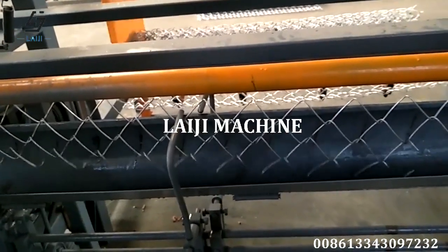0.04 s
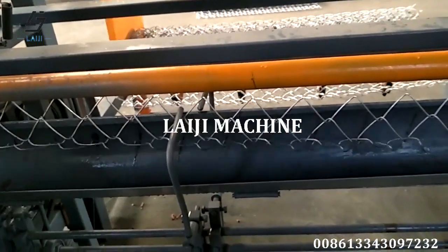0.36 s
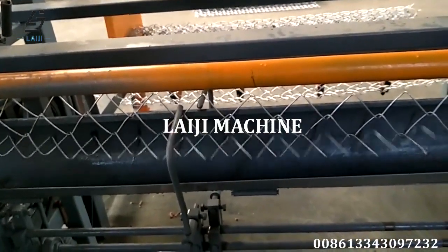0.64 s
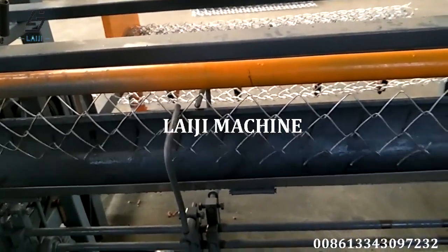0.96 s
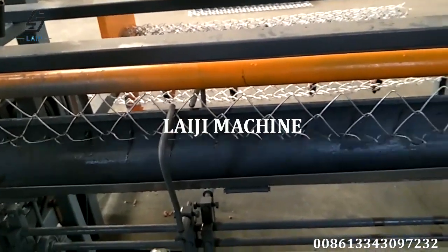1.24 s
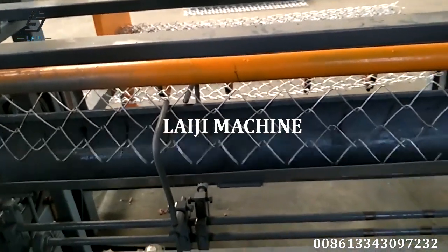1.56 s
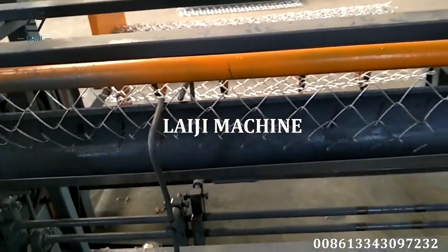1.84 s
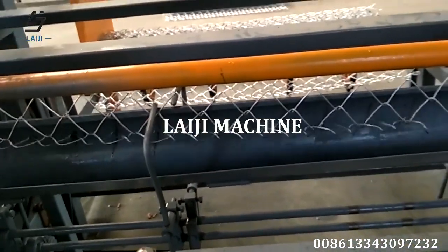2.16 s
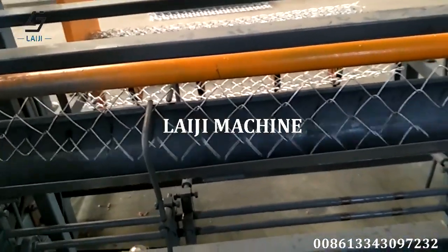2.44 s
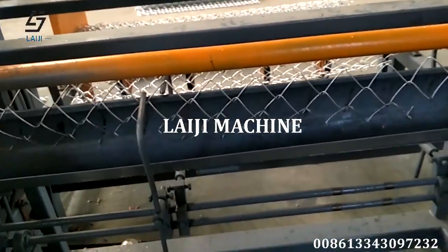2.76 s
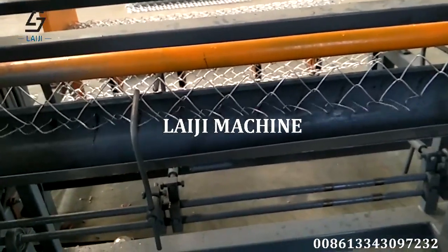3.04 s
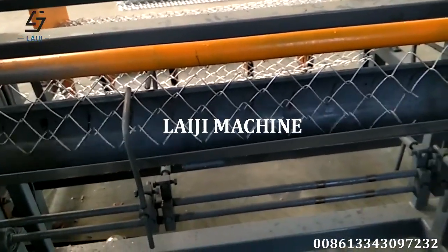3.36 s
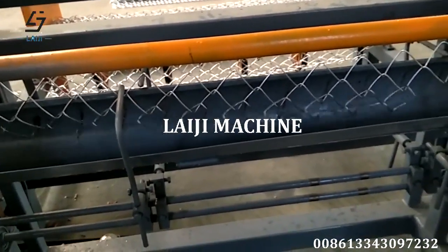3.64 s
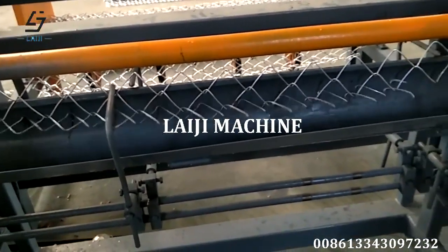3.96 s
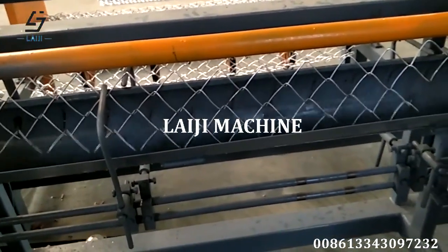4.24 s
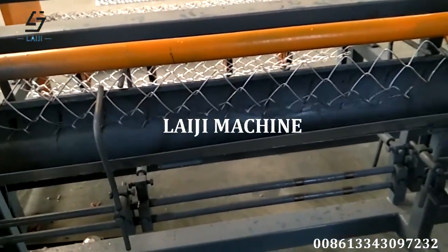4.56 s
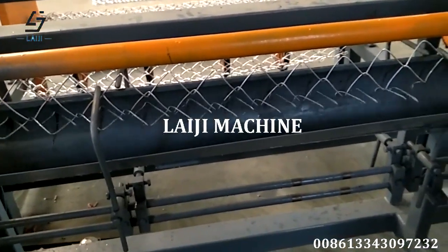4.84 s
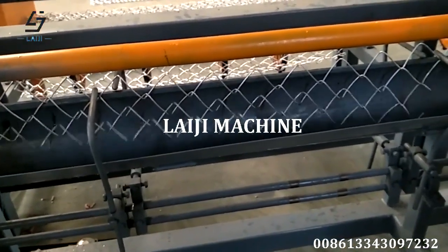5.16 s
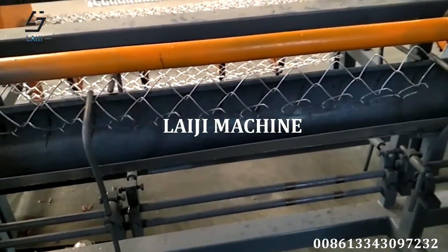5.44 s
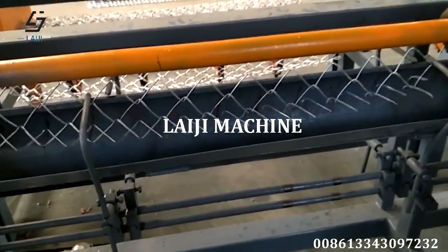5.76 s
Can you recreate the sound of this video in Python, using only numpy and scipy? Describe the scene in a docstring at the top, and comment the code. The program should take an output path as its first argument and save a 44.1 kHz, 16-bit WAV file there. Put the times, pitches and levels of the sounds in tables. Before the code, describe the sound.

A chain-link weaving machine runs in a hard-walled workshop, heard from close above its roller. A low motor hum and quiet rumble continue throughout. It opens with a faint fading metal ring and a few light wire scrapes. The cutter then slams shut at about 0.9, 1.6, 2.6, 3.4, 4.3 and 5.1 seconds. These blows are by far the loudest sounds: sharp, bright steel clanks with a brief high ring, loose jangling and a short echo. Between them, the wire spiral and hanging mesh tick, scrape and rattle more softly, getting busier from about 3.5 seconds, with clearer clinks near 4.1 and 5.2 seconds. The frame gives occasional dull knocks, most noticeably around 4.5 seconds. A dry bearing squeals faintly near 2.7 seconds and more weakly near 4.7. Light wire clatter carries on until the end, near 6 seconds.

```python
"""A chain-link weaving machine

The machine works in a hard-walled shop and is heard from just above its roller. About every 0.85 s
the cutter slams shut and its steel parts ring. Between the blows the wire spiral and the hanging mesh
clatter and tick, each sound made of many tiny impacts. The frame knocks, a dry bearing squeals
faintly and the motor hums underneath."""
import sys
import numpy as np
from scipy import signal
from scipy.fft import rfft, irfft, next_fast_len
from scipy.io import wavfile
from scipy.ndimage import uniform_filter1d

SR = 44100
rng = np.random.default_rng(int(sys.argv[2]) if len(sys.argv) > 2 else 0)


def generate_wav(signal):
    """Clip the signal to [-1, 1] and save it as 16-bit WAV at the path in sys.argv[1]."""
    frames = np.transpose(np.atleast_2d(signal))
    scaled = np.clip(frames, -1, 1) * 32767
    pcm = np.round(scaled).astype(np.int16)
    wavfile.write(sys.argv[1], SR, pcm)


N = 259749
TIME = np.arange(N) / SR

# Levels in dB are relative: 0 leaves a sound as it is, -6 about halves its height.
# The tone of the shop's rumble. Each row: frequency in Hz, level in dB.
SHOP_TONE = [(15, 5), (25, 4), (105, -7), (145, -7), (277, -13.5), (451, -12.5), (575, -16.5),
             (1290, -16.5), (1650, -19), (2160, -17.5), (2350, -20), (7110, -29.5), (10700, -36),
             (16000, -77)]
# The shop's echo. Each row: frequency in Hz, seconds to fade by 60 dB, level in dB.
ECHO_BANDS = [(300, 0.65, -19), (1030, 0.65, -4), (2770, 0.53, -9), (4770, 0.61, -12.5),
              (9200, 0.75, -12.5), (14000, 0.63, -9.5)]
# How the motor's low hum swells. Each row: time in seconds, level in dB.
HUM_SWELLS = [(0.0, -70), (0.4, -56.5), (1.4, -74), (1.6, -64), (2.1, -73.9), (2.3, -63), (2.9, -56.5),
              (3.49, -79), (4.09, -54.7), (4.79, -57.5), (5.49, -53), (5.89, -58.5)]
# The motor's steady higher tones. Each row: frequency in Hz, level in dB.
MOTOR_TONES = [(100, -67.5), (275, -69), (363, -78)]
# Squeals of the dry bearing. Each row: start in seconds, hold in seconds, level in dB.
BEARING_SQUEALS = [(2.5, .1, -59), (2.708, 0.25, -51), (4.665, 0.38, -62.5)]
# Dull knocks of the frame. Each row: time in seconds, pitch in Hz, level in dB.
FRAME_KNOCKS = [(.14, 730, -48.5), (.5, 559, -56.5), (1.81, 754, -45), (2.08, 840, -49), (2.23, 840, -51),
                (2.77, 300, -52.5), (2.91, 720, -44), (2.93, 283, -50), (3.5, 487, -55.5), (3.8, 196, -52),
                (4.41, 710, -50), (4.53, 504, -40.5), (4.565, 200, -41.5), (5.46, 890, -46.5),
                (5.46, 202, -53)]
# The tones of the frame, the wire and its rubbing surface. Each row: frequency in Hz, level in dB.
FRAME_TONE = [(100, -16), (300, -19), (800, 1), (1300, -3.5), (2100, 8), (2800, -14), (4500, -9.5)]
WIRE_TONE = [(1500, -88), (2600, -6), (3300, -6.5), (4200, -1.5), (5300, 4.5), (6400, -4), (7500, -20.5),
             (11000, -34)]
FIZZ_TONE = [(4500, -24), (7500, -4.5), (9500, -3.5), (11500, 2.5), (13500, 4), (16000, -4)]
# Wire slips over wire. Each row: time in seconds, level in dB.
WIRE_SCRAPES = [(0.074, -32.5), (0.301, -39), (0.41, -41), (0.8, -48.5), (1.262, -45), (1.349, -50.5),
                (1.496, -47.5), (1.874, -37), (1.999, -41.5), (2.83, -30.5), (3.535, -35), (3.613, -37),
                (3.977, -40), (4.061, -31.5), (4.731, -46), (5.499, -39), (5.743, -37)]
# A loose wire end hits a bar. Each row: time in seconds, level in dB.
WIRE_CLINKS = [(2.54, -54), (3.63, -54), (3.696, -39), (3.743, -45), (4.06, -25.5), (4.988, -34),
               (5.246, -23.5), (5.509, -32.5), (5.804, -38)]
# The spiral drops onto the mesh; the rows at 0.882 s and 4.336 s are instead wire scrapes that lead into the
# cutter's blows. Each row: time in seconds, level in dB, decay in seconds, # brightness in dB.
SPIRAL_RATTLES = [(0.134, -41, 0.026, -23), (0.882, -43.5, 0.18, 3), (0.999, -36.5, 0.03, 0),
                  (1.796, -36.5, 0.06, 5.5), (2.066, -33.5, 0.048, -2), (2.215, -40, 0.076, 5),
                  (2.899, -33, 0.056, -4), (3.794, -25.5, 0.03, 1.5), (4.336, -36.5, 0.076, 1.5),
                  (4.492, -36.5, 0.055, 0.5), (4.677, -34.5, 0.019, 5), (4.731, -36.5, 0.036, 7.5),
                  (4.797, -29, 0.034, -2), (5.459, -53, 0.018, -33), (5.589, -43.5, 0.079, 1)]
# The cutter's blows. Each row: time in seconds, level in dB, rise in seconds, decay in seconds,
# pitch as a ratio, level of the mesh ticking that follows in dB, then how loudly the bar,
# the blade and the wire end ring, each in dB.
CUTTER_BLOWS = [(0.091, -44, .002, .01, 1.4, -65, -14, -11, -24),
                (0.906, -10.5, 0.0051, .015, 1.06, -77, -6.5, 5.5, 2),
                (1.6195, -14, .0008, 0.02, 1.085, -52, -0.5, -22, -2.5),
                (2.6244, -10.5, 0.0015, .017, 0.99, -77, -5.5, 3, -3),
                (3.3652, -10.5, 0.0021, .013, 1.13, -50, -6.5, -18.5, 3),
                (4.3496, -10, 0.0037, 0.017, 0.97, -50, 2, 3, -6),
                (5.1177, -9, 0.0009, .012, 1.16, -57.5, -1, -8.5, -4)]
# The notes the cutter rings at. Each row: frequency in Hz, level in dB, seconds to fade by 60 dB,
# part (0 is the bar, 1 the blade, 2 the wire end).
CUTTER_NOTES = [(1168, -35, .36, 0), (1235, -37, .1, 0), (1750, -43, .18, 0), (2880, -37, .1, 1),
                (3177, -17, .09, 1), (3290, -27, .06, 1), (4167, -37, .15, 1), (5135, -29, .1, 1),
                (5378, -35, .12, 1), (6186, -16, .12, 2), (6290, -27, .06, 2), (6530, -32, .1, 2),
                (7031, -35, .2, 2)]
# The tone of steel chattering on steel. Each row: frequency in Hz, level in dB.
CHATTER_TONE = [(150, -47), (450, -28), (950, -24.5), (1300, -17.5), (2400, -15.5), (3400, -5),
                (4200, -4.5), (5200, -1.5), (6400, -3), (7500, -11), (10000, -13), (15500, -20)]
# How the machine sounds on each side. Each row: frequency in Hz, left minus right in dB.
SIDE_BALANCE = [(120, -2.5), (400, -3), (700, -4), (1300, -8.5), (2400, -10), (3300, -5.5), (4900, 0.5),
                (6300, -0.5), (8000, -4), (15000, -1.5)]

MESH_REST_DB = -64  # ticking between feeds
LEFT_RIGHT = np.array([[1], [-1]])  # plus on the left, minus on the right


def undb(db):
    """Turn decibels into a number to multiply by."""
    return 10 ** (np.asarray(db) / 20)


def unit(x):
    """Scale a signal to an average power of 1."""
    return x / np.sqrt(np.mean(x ** 2))


def colour(x, points):
    """Shape a sound's tone by (Hz, dB) points; white noise keeps its power."""
    hz, db = np.transpose(points)
    size = next_fast_len(x.shape[-1])
    log_hz = np.log(np.arange(size // 2 + 1) * SR / size + 1)
    gain = undb(np.interp(log_hz, np.log(hz), db))
    return irfft(rfft(x, size) * unit(gain), size)[..., :x.shape[-1]]


def add(out, s, sound):
    """Mix in a stereo sound starting at s seconds."""
    start = int(s * SR)
    lo, hi = max(start, 0), min(start + sound.shape[-1], N)
    out[:, lo:hi] += sound[:, lo - start:hi - start]


def fade(t, t60):
    """Die away by 60 dB every t60 seconds."""
    return np.exp(-np.log(1000) * t / t60)


def swell(t, rise_s, decay_s):
    """Grow to a peak at t = 0, then die away."""
    return np.exp(np.minimum(t, 0) / rise_s - np.maximum(t, 0) / decay_s)


def gate(s, attack_s, hold_s, release_s):
    """Starting at s seconds: ramp up, hold, then die away."""
    t = TIME - s
    return np.clip(t / attack_s, 0, 1) * np.exp(-np.maximum(t - attack_s - hold_s, 0) / release_s)


def wander(per_s, size=N):
    """Glide between random values, typically about 1 either side of zero."""
    hold = int(SR / per_s)
    steps = np.repeat(rng.standard_normal(size // hold + 1), hold)
    return unit(uniform_filter1d(uniform_filter1d(steps, hold), hold)[:size])


def contacts(size, per_s, spread_db):
    """Tiny impacts at random times and of uneven strength."""
    hit = rng.random(size) < per_s / SR
    direction = rng.choice([-1, 1], size)
    strength = undb(spread_db * np.clip(rng.standard_normal(size), -2, 2))
    return unit(hit * direction * strength)


def steel(ring_db, t60, scatter_db, scatter_s, notes_per_hz, uneven_db, lag_s=.0005):
    """How one spot answers a tap: a click, ringing wire notes and reflections from the bars."""
    t = np.arange(SR // 8) / SR
    bins = len(t) // 2 + 1
    is_note = rng.random(bins) < notes_per_hz * SR / len(t)
    strength = is_note * undb(uneven_db * rng.standard_normal(bins))
    notes = irfft(strength * np.exp(2j * np.pi * rng.random((2, bins))), len(t)) * fade(t, t60)
    bars = rng.standard_normal((2, len(t))) * np.exp(-t / scatter_s)
    response = (undb(ring_db) * unit(notes) + undb(scatter_db) * unit(bars)) / np.sqrt(len(t))
    # each spot lies at its own angle, so the click reaches one side first
    response[[0, 1], (2 * lag_s * SR * rng.random(2)).astype(int)] += 1
    return response / np.sqrt(np.sum(response ** 2) / 2)


def strike(force, response):
    """Let every impact set off the steel's response."""
    return signal.fftconvolve(force[None], response, axes=1)[:, :len(force)]


def feeding(wait_s=0.089):
    """How strongly the mesh is stirred: after each blow the next spiral is fed in."""
    strokes = sum(undb(mesh_db) * gate(s + wait_s, attack_s=0.07, hold_s=0.4, release_s=0.26)
                  for s, _, _, _, _, mesh_db, *_ in CUTTER_BLOWS)
    return undb(MESH_REST_DB) + strokes


def shop_rumble(level_db=-56.5, wide_hz=300, flicker_db=1):
    """Machinery rumbles, more while wire is fed; the bass is central and the treble spreads wide."""
    middle, side = colour(rng.standard_normal((2, N)), SHOP_TONE)
    side = signal.sosfilt(signal.butter(2, wide_hz, "high", fs=SR, output="sos"), side)
    load = (feeding() / undb(MESH_REST_DB)) ** 0.18  # 0.18 dB louder per dB of stirring
    return unit(middle + side * LEFT_RIGHT) * load * undb(level_db + flicker_db * wander(per_s=11))


def shop_echo(x, build_s=0.0095):
    """The hard walls return a wash of echoes that builds quickly and fades band by band."""
    t = np.arange(SR) / SR
    log_hz = np.log(np.arange(SR // 2 + 1) + 1)
    log_centres = np.log(np.array(ECHO_BANDS)[:, 0])
    noise, tail = rfft(rng.standard_normal((2, SR))), 0
    for (_, t60, db), share in zip(ECHO_BANDS, np.eye(len(ECHO_BANDS))):
        band = irfft(noise * np.interp(log_hz, log_centres, share), SR)
        loudness = unit(fade(t, t60) * (1 - np.exp(-t / build_s)))
        tail = tail + undb(db) * band * loudness / np.sqrt(SR)
    return signal.fftconvolve(x, tail, axes=1)[:, :N]


def frame_drone(hz=197, db=-65, throb_db=3):
    """The drive keeps one low note of the frame rumbling."""
    peak = [(hz / 2, -60), (hz / 1.28, -16), (hz, 0), (hz * 1.69, -16), (hz * 2, -70)]
    rumble = colour(rng.standard_normal(N), peak)
    return unit(rumble) * undb(db + throb_db * wander(per_s=17))


def motor(hum_hz=51.7, hum_db=-1.5, wobble_rad=0.18, throb_db=3.5):
    """The motor's low hum swells and throbs under steady higher tones."""
    hum = unit(np.sin(2 * np.pi * hum_hz * TIME + wobble_rad * wander(per_s=15)))
    swells = undb(np.interp(TIME, *np.transpose(HUM_SWELLS)))
    throb = undb(hum_db + throb_db * wander(per_s=8))
    tones = sum(undb(db) * unit(np.sin(2 * np.pi * hz * TIME + wobble_rad * wander(per_s=23)))
                for hz, db in MOTOR_TONES)
    return hum * swells * throb + tones


def bearing(hz=884, waver=0.0272, flutter_db=2.5, level_db=-2):
    """The dry bearing rubs and gives a thin, rough squeal."""
    phase = 2 * np.pi * np.cumsum(hz * (1 + waver * wander(per_s=160))) / SR
    rubbing = sum(undb(db) * gate(s, attack_s=0.025, hold_s=hold_s, release_s=0.017)
                  for s, hold_s, db in BEARING_SQUEALS)
    return unit(np.sin(phase)) * rubbing * undb(level_db + flutter_db * wander(per_s=60))


def frame_knocks(rise_s=0.0045, usual_decay_s=0.067, usual_db=-49.5, octave_db=-19):
    """Soft shoves make the heavy frame boom briefly around one pitch."""
    out, t = np.zeros((2, N)), np.arange(-SR // 12, SR // 3) / SR
    for s, hz, db in FRAME_KNOCKS:
        decay_s = usual_decay_s * undb(0.64 * (usual_db - db))  # a harder knock is shorter
        shove = rng.standard_normal(len(t)) + 0.5 * rng.standard_normal((2, len(t)))
        peak = [(hz / 8, 2 * octave_db), (hz / 2, octave_db), (hz, 0),
                (hz * 2, octave_db), (hz * 8, 3 * octave_db)]
        boom = unit(colour(shove, peak))
        add(out, s + t[0], undb(db) * boom * swell(t, rise_s, decay_s))
    return out


def mesh_ticks(wire_db=-2, fizz_db=-3, restless_db=3, links=4):
    """Several links of the hanging mesh tick lightly as it shifts."""
    ticks, stir = 0, feeding()
    for _ in range(links):
        link = steel(ring_db=8, t60=0.12, scatter_db=7.5, scatter_s=0.013,
                     notes_per_hz=0.011, uneven_db=-0.5)
        taps = contacts(N, per_s=22, spread_db=3.5) * stir
        ticks = ticks + strike(taps, link) / np.sqrt(links)
    sound = undb(wire_db) * colour(ticks, WIRE_TONE) + undb(fizz_db) * colour(ticks, FIZZ_TONE)
    return sound * undb(restless_db * wander(per_s=18))


def wire_hit(t, rise_s, decay_s, slap, frame_db, wire_db, fizz_db, pan_db):
    """A wire slaps the mesh or frame and chatters to rest; each time another stretch of it rings."""
    body = steel(ring_db=2, t60=0.042, scatter_db=3, scatter_s=0.0015,
                 notes_per_hz=0.034, uneven_db=4.5)
    chatter = contacts(len(t), per_s=1400, spread_db=2) * swell(t, rise_s, decay_s)
    rattle = strike(slap * (t == 0) + chatter, body)
    layers = [(frame_db, FRAME_TONE), (wire_db, WIRE_TONE), (fizz_db, FIZZ_TONE)]
    sound = sum(undb(db) * colour(rattle, tone) for db, tone in layers)
    return sound * undb(pan_db * LEFT_RIGHT / 2)


def wire_scrapes():
    """Wire glances off wire with a short, bright scrape that is nearly all fizz."""
    out, t = np.zeros((2, N)), np.arange(-SR // 12, SR // 3) / SR
    for s, db in WIRE_SCRAPES:
        scrape = wire_hit(t, rise_s=0.0034, decay_s=0.021, slap=10.7,
                          frame_db=-26.5, wire_db=-10.5, fizz_db=-1.1, pan_db=-5)
        add(out, s + t[0], undb(db) * scrape)
    return out


def wire_clinks():
    """A loose end taps a bar, and mostly the wire itself rings."""
    out, t = np.zeros((2, N)), np.arange(-SR // 12, SR // 3) / SR
    for s, db in WIRE_CLINKS:
        clink = wire_hit(t, rise_s=0.0028, decay_s=0.017, slap=10.8,
                         frame_db=-16, wire_db=0, fizz_db=-22, pan_db=-2)
        add(out, s + t[0], undb(db) * clink)
    return out


def spiral_rattles():
    """The spiral bounces: a dull landing shakes the frame, a bright one fizzes along the mesh. Just before two
    of the blows, a wire scrapes the same way."""
    out, t = np.zeros((2, N)), np.arange(-SR // 12, SR // 3) / SR
    for s, db, decay_s, bright_db in SPIRAL_RATTLES:
        rise_s = 0.25 * min(decay_s, .04)
        rattle = wire_hit(t, rise_s, decay_s, slap=9.7, frame_db=-7 - 0.51 * bright_db,
                          wire_db=0.5, fizz_db=-3 + bright_db, pan_db=-4)
        add(out, s + t[0], undb(db) * rattle)
    return out


def opening_ring(part_db=(-16, -30, -26), wash_db=-43, decay_s=0.16):
    """As the scene opens, the cutter is still ringing from the stroke before."""
    ring = 0
    for hz, db, _, part in CUTTER_NOTES:
        loudness = undb(db + part_db[round(part)] + 2 * wander(per_s=100))
        ring = ring + loudness * np.sin(2 * np.pi * (hz * TIME + rng.random((2, 1))))
    wash = undb(wash_db) * colour(rng.standard_normal((2, N)), CHATTER_TONE)
    return (ring + wash) * np.exp(-TIME / decay_s)


def cutter_ring(pan_db=-2, jostle_rad=0.031, buzz_db=3.5, build_s=0.0018):
    """The bar, the blade and the cut wire end ring after each blow."""
    out, t = np.zeros((2, N)), np.arange(SR // 4) / SR
    for s, _, _, decay_s, _, _, *part_db in CUTTER_BLOWS:
        for hz, db, t60, part in CUTTER_NOTES:
            loudness = fade(t, t60) * (1 - np.exp(-t / build_s))
            # the bouncing jaws jostle the ring, and the loose wire buzzes against it
            bounces = rng.standard_normal((2, len(t))) * np.exp(-t / decay_s)
            jostle = jostle_rad * np.cumsum(bounces, axis=1)
            buzz = undb(buzz_db * wander(per_s=130, size=len(t)))
            phase = 2 * np.pi * (hz * t + rng.random((2, 1))) + jostle
            ring = np.sqrt(2) * np.sin(phase) * loudness * buzz
            add(out, s, ring * undb(db + part_db[round(part)] + pan_db * LEFT_RIGHT / 2))
    return out


def cutter_blows(jangle_db=-28, jangle_s=0.09):
    """Each blow is a burst of hard steel-on-steel contacts, then loose jangling."""
    out, t = np.zeros((2, N)), np.arange(-SR // 25, SR // 2) / SR
    for s, db, rise_s, decay_s, pitch, *_ in CUTTER_BLOWS:
        body = steel(ring_db=-3.5, t60=0.064, scatter_db=-0.5, scatter_s=0.0029,
                     notes_per_hz=.04, uneven_db=4.5)
        slam = contacts(len(t), per_s=6000, spread_db=3) * swell(t, rise_s, decay_s)
        jangle = contacts(len(t), per_s=450, spread_db=-2) * swell(t, rise_s, jangle_s)
        clank = strike(slam + undb(jangle_db) * jangle, body)
        tone = np.array(CHATTER_TONE) * [pitch, 1]
        add(out, s + t[0], undb(db) * colour(clank, tone))
    return out


def scene(clatter_echo_db=-1, ring_echo_db=-4):
    """Mix the machine, its echo in the shop and the background."""
    heavy = cutter_blows() + frame_knocks() + bearing()
    ring = cutter_ring()
    clatter = spiral_rattles() + wire_clinks() + wire_scrapes() + mesh_ticks()
    # the small ringing parts are close by and fill the shop less than the whole frame does
    echo = shop_echo(heavy + undb(clatter_echo_db) * clatter + undb(ring_echo_db) * ring)
    return heavy + ring + clatter + echo + opening_ring() + motor() + frame_drone() + shop_rumble()


def record(dry, bottom_hz=28, top_hz=16100):
    """Give each side its own tone, cut the deepest bass, clip the loudest peaks and cut the top."""
    left = colour(dry[0], [(hz, db / 2) for hz, db in SIDE_BALANCE])
    right = colour(dry[1], [(hz, -db / 2) for hz, db in SIDE_BALANCE])
    bass_cut = signal.butter(2, bottom_hz, "high", fs=SR, output="sos")
    top_cut = signal.ellip(12, .2, 90, top_hz, fs=SR, output="sos")
    heard = signal.sosfilt(bass_cut, np.array([left, right]))
    return signal.sosfilt(top_cut, np.clip(heard, -1, 1))


dry = scene()
out = record(dry)
generate_wav(out)
```